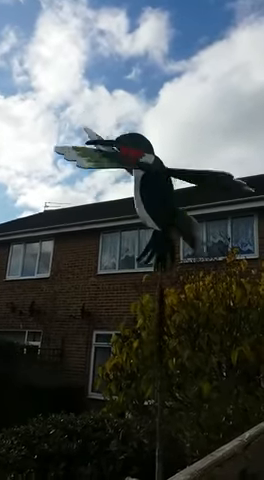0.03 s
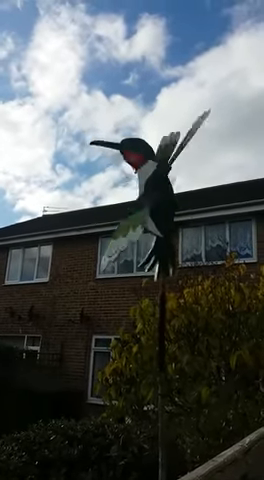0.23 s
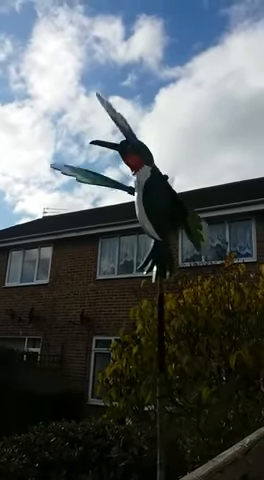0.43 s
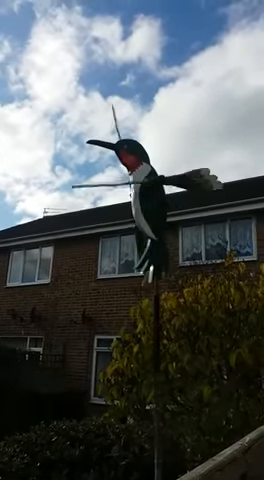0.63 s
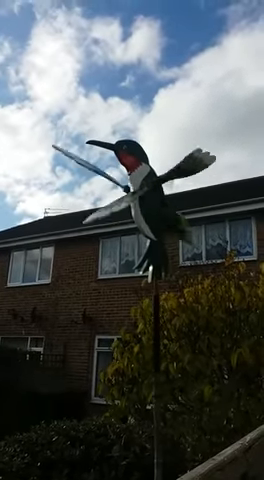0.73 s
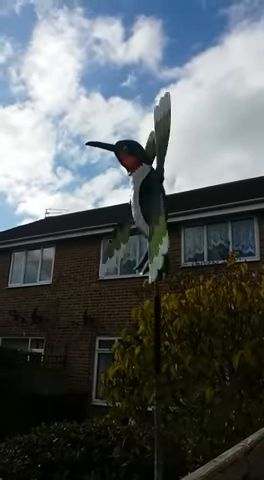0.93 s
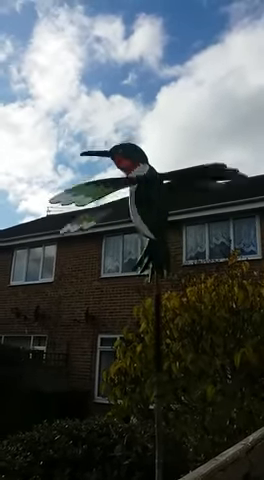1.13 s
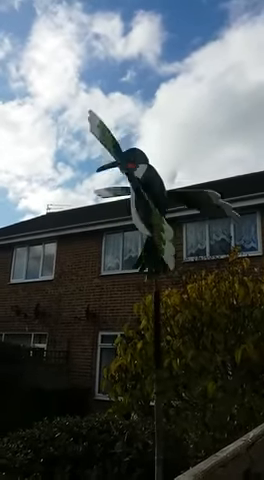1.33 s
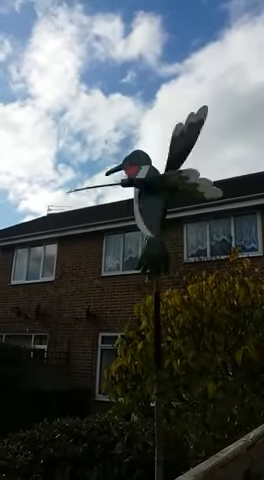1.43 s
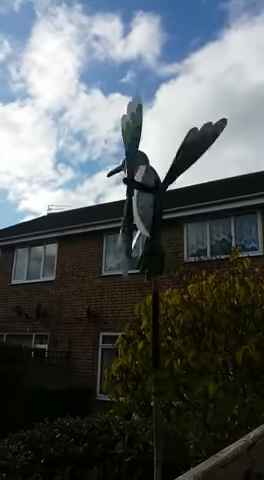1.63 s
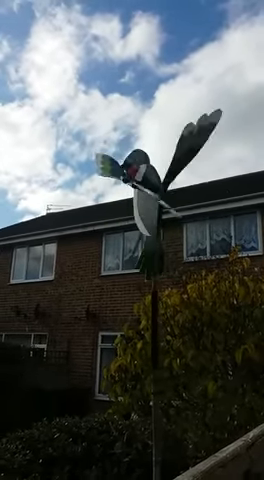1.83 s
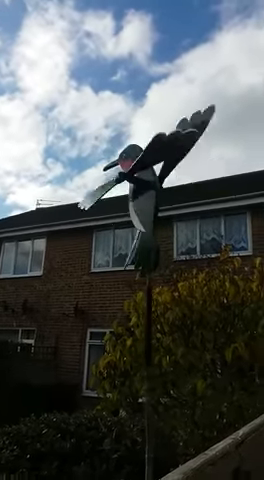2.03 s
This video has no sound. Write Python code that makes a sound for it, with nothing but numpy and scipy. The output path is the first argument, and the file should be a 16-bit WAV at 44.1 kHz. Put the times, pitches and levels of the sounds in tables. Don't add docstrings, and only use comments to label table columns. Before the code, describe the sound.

Wind buffets a phone microphone in a garden, low fluttering thumps coming in uneven gusts, the strongest near the end before it suddenly drops, with faint clacks and metal ticks from a spinning bird ornament.

```python
import sys
import numpy as np
from scipy import signal
from scipy.fft import rfft, irfft, next_fast_len
from scipy.io import wavfile
from scipy.ndimage import uniform_filter1d, map_coordinates

SR = 44100
rng = np.random.default_rng(int(sys.argv[2]) if len(sys.argv) > 2 else 0)


def put_to_file(sound):
    columns = np.atleast_2d(sound).T
    safe = np.clip(columns, -1, 1)
    whole_steps = np.round(safe * 32767)
    wavfile.write(sys.argv[1], SR, whole_steps.astype(np.int16))


def convert_level_to_amplitude(level_db):
    exponent = np.asarray(level_db, float) / 20
    return 10 ** exponent


N = 92610

# [t/s, level/dB]
GUST_STRENGTH = [(0, -45.5), (.15, -43.5), (.21, -41.5), (.26, -29), (.36, -34.5), (.5, -25), (.62, -32),
                 (.77, -32.5), (.8, -40.5), (.9, -26.5), (1.2, -28.5), (1.335, -36.5), (1.45, -24),
                 (1.62, -33.5), (1.68, -19), (1.8, -21), (1.95, -43), (2.1, -39.5)]
# [t/s, level/dB, f/Hz]
STRONG_EDDIES = [(0.2347, -10.5, 169.6), (0.2536, -17, 135), (0.292, -16, 129.7), (0.4242, -15.5, 109.4),
                 (0.4551, -16, 156), (0.4727, -12, 142.4), (0.487, -10, 160), (0.5088, -10, 135),
                 (0.5288, -12, 174), (0.5444, -12, 143), (0.5632, -16, 131.6), (0.5844, -16, 131.6),
                 (0.5983, -9, 129), (0.873, -18.5, 107), (0.919, -17.5, 84.06), (0.938, -12, 121.9),
                 (0.9588, -10, 127.6), (1.0238, -16, 134), (1.0345, -12, 168), (1.0706, -13, 134.4),
                 (1.156, -17, 107), (1.2119, -14, 161.5), (1.2269, -14, 133.9), (1.2495, -17, 111.4),
                 (1.3661, -12.5, 151.2), (1.4037, -15.5, 125.2), (1.4314, -11, 96.6), (1.4505, -18.5, 131),
                 (1.4625, -13, 131.2), (1.4793, -14.5, 131), (1.49, -10, 143.7), (1.503, -8.5, 125.5),
                 (1.5153, -10.5, 135.6), (1.6728, -5.5, 117.6), (1.6862, -10, 102.4), (1.7194, -4.5, 136.7),
                 (1.7356, -11, 179), (1.7587, -14, 155), (1.7692, -7, 112), (1.7942, -7.5, 117.9),
                 (1.8203, -11.5, 128.6)]
# [t/s, level/dB, f/Hz]
LESSER_EDDIES = [(0.317, -26.5, 104.5), (0.337, -24.5, 123), (0.3792, -21, 137), (0.6816, -20, 120),
                 (0.6959, -22, 141), (0.7142, -25, 142), (0.7637, -22, 141.4), (0.8462, -23, 101.5),
                 (0.897, -22.5, 102.9), (0.9706, -19, 124), (1.006, -19.5, 108.4), (1.052, -19, 153),
                 (1.1088, -19, 138.4), (1.1327, -22, 111.6), (1.192, -24, 145.6), (1.2698, -19, 140.3),
                 (1.2849, -20, 129.6), (1.3849, -19, 112.5), (1.4162, -25, 93), (1.5269, -20, 103.7),
                 (1.538, -22, 138.5), (1.5546, -25.5, 106.3), (1.5707, -21, 154.3), (1.5928, -20, 150),
                 (1.6481, -20, 166), (1.8342, -22, 116), (1.8612, -23, 89.6), (1.879, -23.5, 143),
                 (1.8959, -22, 133)]
# [t/s, level/dB, f/Hz]
GUST_FRONTS = [
    (.226, -13, 225),
    (1.706, -7, 195),
]
# [multiple of the passing pitch, density/dB]
FROZEN_TURBULENCE = [(.15, -20.5), (.6, -9.5), (1.1, -9.5), (1.8, -10.5), (2.6, -23.5), (3.6, -38),
                     (5.5, -55), (8, -110)]
# [f/Hz, density/dB per Hz]
SURGE_SPECTRUM = [(20, -22), (55, 0), (90, -2), (130, -16), (240, -50)]
# [t/s, level/dB, f/Hz]
RIPPLE_EDDIES = [(0.2297, -17, 286), (0.3877, -33.5, 280), (0.4228, -23.5, 320), (0.4358, -26, 310),
                 (0.4477, -23.5, 310), (0.4577, -28, 330), (0.4685, -16.5, 258), (0.4824, -12.5, 310),
                 (0.504, -35, 250), (0.5132, -25, 290), (0.5295, -10.5, 323), (0.5417, -20.5, 330),
                 (0.564, -29, 290), (0.5762, -20, 310), (0.5943, -24, 279), (0.7083, -29, 260),
                 (0.9348, -26, 306), (0.9564, -20.5, 325.4), (0.9737, -27, 310), (1, -32, 290),
                 (1.02, -28.5, 259), (1.0357, -13.5, 327), (1.0501, -31, 300), (1.0605, -22, 320),
                 (1.1094, -30.5, 296), (1.2119, -18, 333.6), (1.2282, -19.5, 322.5), (1.3719, -29.5, 276),
                 (1.399, -24, 330), (1.4167, -28, 310), (1.4294, -20.5, 330), (1.4462, -29.5, 267),
                 (1.4654, -20.5, 317.3), (1.4758, -20.5, 299), (1.4966, -17.5, 326), (1.5118, -16, 300),
                 (1.5316, -29, 293), (1.593, -31.5, 282), (1.6586, -21.5, 290), (1.6691, -13.5, 310),
                 (1.6822, -18.5, 320), (1.6943, -20.5, 340), (1.7027, -11, 330), (1.7153, -10, 391.6),
                 (1.7286, -18.5, 313), (1.738, -17.5, 290), (1.7492, -19.5, 330), (1.7671, -9.5, 265),
                 (1.7768, -11, 306), (1.7895, -18.5, 300), (1.8046, -32, 300), (1.82, -25, 347)]
# [t/s, level/dB, f/Hz]
SHARP_EDGES = [(0.2298, -26.5, 566), (0.2386, -40, 620), (0.4487, -36.5, 695), (0.4594, -36.5, 560),
               (0.4715, -27.5, 550), (0.4786, -30, 520), (0.4851, -16.5, 547), (0.4917, -30, 616),
               (0.5139, -34, 690), (0.5272, -17.5, 530), (0.5389, -35.5, 660), (1.0349, -29.5, 603),
               (1.061, -31, 597), (1.2119, -29, 570), (1.223, -35, 620), (1.2292, -43, 620),
               (1.4284, -29, 517), (1.4659, -35, 547), (1.4793, -37, 633), (1.4892, -29.5, 560),
               (1.4952, -19, 570), (1.5013, -22, 510), (1.512, -26, 512), (1.52, -36, 510),
               (1.5484, -37.5, 680), (1.661, -40.5, 532), (1.6686, -28.5, 565), (1.688, -14, 568),
               (1.699, -14, 761), (1.7151, -12.5, 590), (1.7261, -17.5, 516), (1.7421, -36, 584),
               (1.7536, -28, 550), (1.7675, -19.5, 682), (1.7818, -28.5, 500), (1.7884, -22, 543)]
# [t/s, level/dB, f/Hz]
SHARPEST_EDGES = [
    (1.693, -32, 1150),
    (1.7135, -24, 480),
    (1.7665, -33, 1350),
    (1.7915, -33, 1200),
]

# [t/s, level/dB, f/Hz]
WING_CLACKS = [(.06, -59, 3050), (0.329, -52.5, 2720), (.43, -63, 2760), (.519, -67.5, 3000),
               (1.118, -54, 3017), (1.125, -58.5, 3410), (1.155, -55.5, 3188), (1.346, -50, 2920),
               (1.366, -49.5, 3330), (1.369, -54, 3100), (1.478, -60, 3300), (1.49, -58.5, 3344),
               (1.514, -59, 3100), (1.528, -62, 3080), (1.635, -54, 3330), (1.7625, -45, 3450),
               (1.813, -56.5, 3575), (1.911, -54, 3107), (1.93, -55.5, 3150)]
# [pitch ratio, level/dB, t60/s]
WING_MODES = [(1, 0, .02), (.88, -2, .016), (1.12, -3, .016)]
# [t/s, level/dB]
BODY_KNOCKS = [
    (.061, -65),
    (1.366, -54.5),
    (1.478, -61.5),
    (1.763, -55),
    (1.839, -58),
]
# [t/s, level/dB, brightness/dB]
PIVOT_TICKS = [
    (0.33, -58.5, -5.5),
    (.43, -57.5, -9.5),
    (.577, -64, -9.5),
    (1.081, -67, -6),
    (1.9099, -52.5, 0.5),
    (1.9121, -49, -0.5),
    (1.925, -67.5, 9),
    (1.9382, -55, -13),
]
# [f/Hz, level/dB, t60/s]
PIVOT_MODES = [(5550, 1, 0.017), (4650, -2.5, .012), (10080, 3, .011), (9700, -9, .01), (13000, -12, .009)]
# [f/Hz, density/dB per Hz]
RATTLE_SPECTRUM = [(1500, -66), (2500, 9.5), (3400, 2.5), (4100, 0.5), (4900, 8), (5700, -8), (7500, -40.5)]

# [f/Hz, density/dB per Hz]
HEDGE_SPECTRUM = [(55, -1.5), (100, 5), (300, -9.5), (600, -12.5), (1100, -7), (2000, -10), (2550, -18),
                  (2850, -32.5), (3600, -81.5)]
# [f/Hz, density/dB per Hz]
HISS_SPECTRUM = [(1900, -26.5), (3200, -3), (4350, -3.5), (5270, -4), (6060, -9), (6930, -9.5), (9860, -6),
                 (15900, -8)]
# [t/s, level/dB, length/s]
LEAF_RUSTLES = [
    (0.037, -67.5, 0.038),
    (1.147, -73, 0.024),
    (1.505, -71, 0.025),
    (1.938, -68.5, 0.0096),
]
# [t/s, level/dB]
BREATHING = [(0, 0.2), (.4, 0.5), (1.1, -1.5), (1.6, 0.85), (2.1, 0.2)]


def unit(x):
    return x / np.sqrt(np.mean(x ** 2) + 1e-20)


def wobble(rate):
    knots = rng.standard_normal(int(N * rate / SR) + 4)
    return map_coordinates(knots, [np.arange(N) * rate / SR])


def filtered(x, response):
    m = next_fast_len(N + 8192)
    return irfft(rfft(x, m) * response(np.fft.rfftfreq(m, 1 / SR)), m)[:N]


def rush(points):
    f, db = np.transpose(points)

    def response(hz):
        return convert_level_to_amplitude(np.interp(np.log(hz + 1), np.log(f + 1), db, right=-150))

    return unit(filtered(rng.standard_normal(N), response))


def puffs(s, level_db, hz, cycles):
    half = 1300
    k = np.arange(-half, half)
    phase = rng.random(len(s))[:, None]
    turns = k / SR * hz[:, None]
    bell = np.exp(-.5 * (turns / cycles) ** 2)
    wave = convert_level_to_amplitude(level_db)[:, None] * bell * np.cos(2 * np.pi * (turns + phase))
    at = np.round(s * SR).astype(int)[:, None] + k + half
    return np.bincount(at.ravel(), wave.ravel(), N + 2 * half + 1)[half:][:N]


def air_flow(s, db, hz):
    gust_db = np.interp(np.arange(N) / SR, *np.transpose(GUST_STRENGTH)) + 2.74 * wobble(25)
    power = convert_level_to_amplitude(2 * (gust_db - 4))
    pitch = power * (np.log(109.13) + .02 * (gust_db + 29.5))
    half, eddy_s, wake_db = 900, .005, -16
    bell = np.exp(-.5 * (np.arange(-half, half) / SR / eddy_s) ** 2)
    for at, level_db, eddy_hz in zip(s, db, hz):
        span = slice(round(at * SR) - half, round(at * SR) + half)
        swell = convert_level_to_amplitude(2 * (level_db + wake_db)) * bell
        power[span] += swell
        pitch[span] += swell * (np.log(170) + 0.6013 * np.log(eddy_hz / 130))
    speed = np.exp(pitch / power + 0.1183 * wobble(60))
    air = rush([(ratio * 1000, g) for ratio, g in FROZEN_TURBULENCE])
    flow = np.sqrt(power) * map_coordinates(air, [np.cumsum(speed) / 1000 + 500])
    surge_s = 0.017
    slow_power = np.abs(uniform_filter1d(power, round(surge_s * SR)))
    return flow + convert_level_to_amplitude(2.5) * np.sqrt(slow_power) * rush(SURGE_SPECTRUM)


def wind():
    s, db, hz = np.transpose(STRONG_EDDIES + LESSER_EDDIES + GUST_FRONTS)
    pressure = puffs(s, db, hz, cycles=0.44) + air_flow(s, db, hz)
    s, db, hz = np.transpose(SHARP_EDGES + SHARPEST_EDGES)
    pressure += puffs(s + 0.0001, db, hz, cycles=0.74)
    s, db, hz = np.transpose(RIPPLE_EDDIES)
    pressure += puffs(s, db + 1, hz, cycles=0.61)
    port_hz, ceiling = 45, .52
    heard = filtered(pressure, lambda f: 1j * f / (port_hz + 1j * f))
    return heard / (1 + np.abs(heard / ceiling) ** 4) ** (1 / 4)


def ring(hz, db, t60, t):
    rise_s = .002
    decay = convert_level_to_amplitude(db + 4.5 - 60 * t / t60)
    return decay * np.sin(2 * np.pi * hz * t) * (1 - np.exp(-t / rise_s))


def ornament():
    out, rattle = np.zeros(N + SR), np.zeros(N + SR)
    t = np.arange(3000) / SR
    for s, db, hz in WING_CLACKS:
        span = slice(round(s * SR), round(s * SR) + len(t))
        for ratio, g, t60 in WING_MODES:
            out[span] += ring(hz * ratio, db + 3.5 + g + 2 * rng.normal(), t60, t)
        rattle[span] += convert_level_to_amplitude(db - 8 - 60 * t / .022) * np.minimum(t / 0.0016, 1)
    for s, db in BODY_KNOCKS:
        out[round(s * SR):][:len(t)] += ring(4980, db + 2.5, .025, t)
    for s, db, bright_db in PIVOT_TICKS:
        tick = sum(ring(hz, g + bright_db * (k > 0), t60, t) for k, (hz, g, t60) in enumerate(PIVOT_MODES))
        crack = convert_level_to_amplitude(-2.5 + bright_db - 60 * t / .014) * rng.standard_normal(len(t))
        out[round(s * SR):][:len(t)] += convert_level_to_amplitude(db + 4.5) * (tick + crack)
    top_hz = 9000
    struck = filtered(out[:N], lambda f: 1 / (1 + (f / top_hz) ** 4) ** .5)
    return struck + rattle[:N] * rush(RATTLE_SPECTRUM)


def leaves():
    t = np.arange(N) / SR
    rustle = sum(convert_level_to_amplitude(db) * np.exp(-.5 * ((t - s) / length) ** 2) for s, db, length in LEAF_RUSTLES)
    return rustle * convert_level_to_amplitude(1.2 * wobble(130)) * rush(RATTLE_SPECTRUM)


def garden():
    breath_db = np.interp(np.arange(N) / SR, *np.transpose(BREATHING)) + 0.47 * wobble(9.4)
    hedge = convert_level_to_amplitude(-44.0 + breath_db) * rush(HEDGE_SPECTRUM)
    hiss = convert_level_to_amplitude(-68.5) * rush(HISS_SPECTRUM)
    return hedge + hiss + leaves()


def scene():
    return (wind() + ornament() + garden())[None]


def top_cut(x):
    return signal.sosfilt(signal.butter(12, 15860, fs=SR, output="sos"), x)


def record(dry):
    cut_hz = 52

    def low_cut(f):
        sections = [-f * f / (cut_hz ** 2 - f * f + 1j * f * cut_hz * damping) for damping in (.52, 1.41, 1.93)]
        return np.prod(sections, axis=0)

    fade = np.minimum(np.arange(N, 0, -1) / 100, 1)
    mix = filtered(dry[0], low_cut) * fade
    return top_cut(mix[None])


dry = scene()
out = record(dry)
put_to_file(out)
```